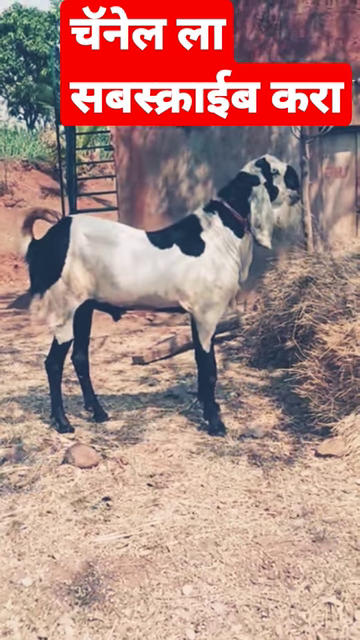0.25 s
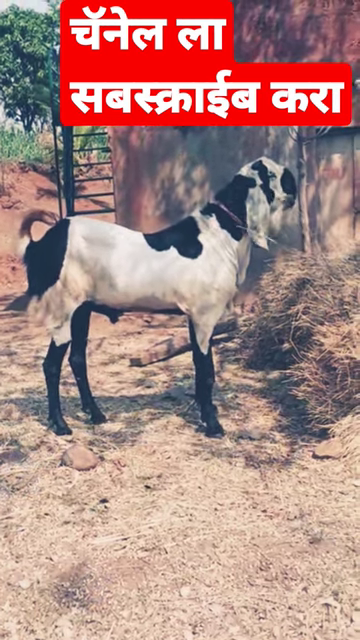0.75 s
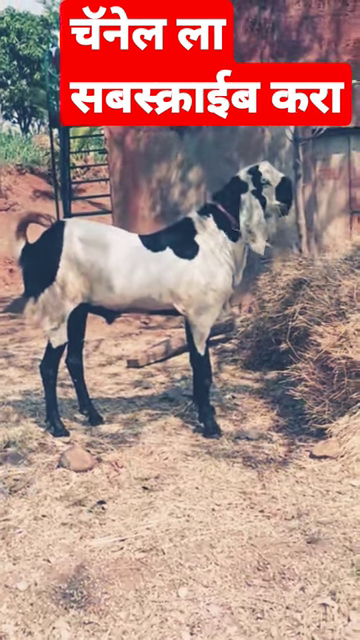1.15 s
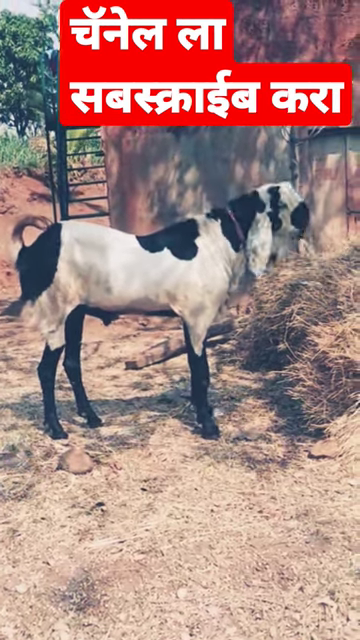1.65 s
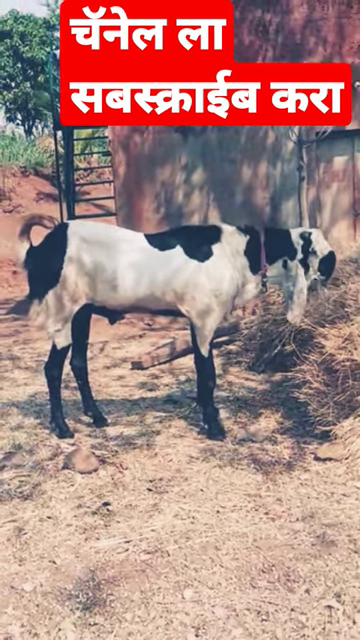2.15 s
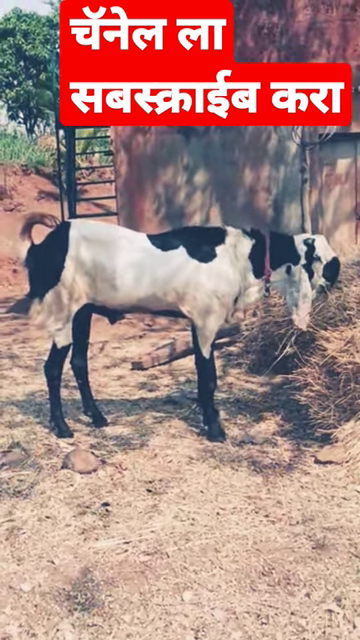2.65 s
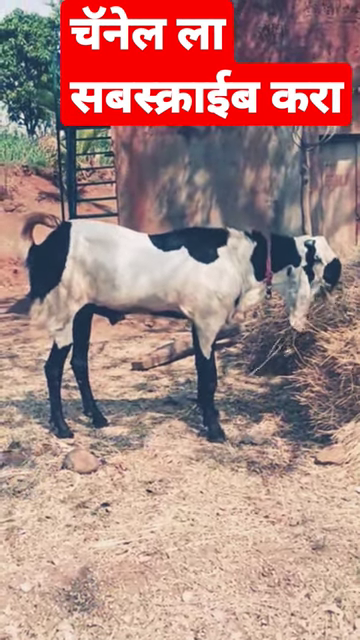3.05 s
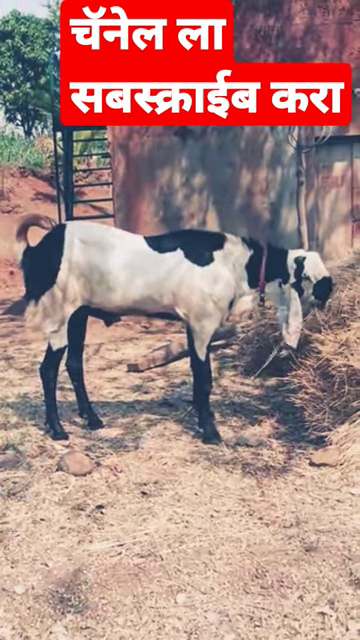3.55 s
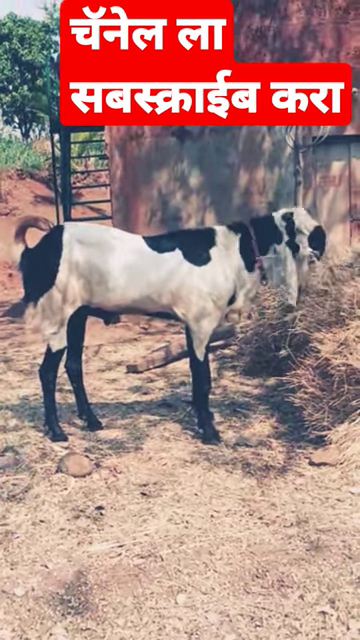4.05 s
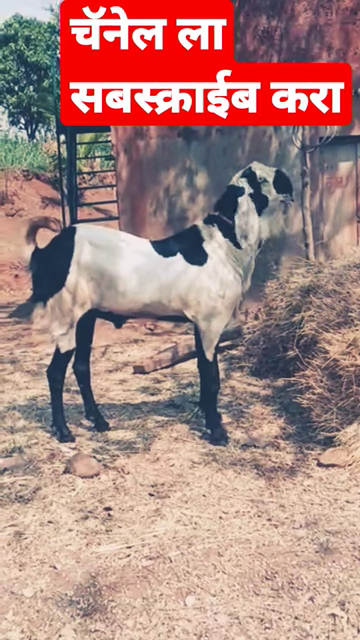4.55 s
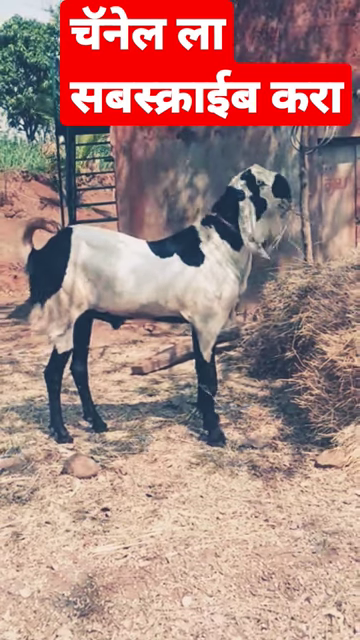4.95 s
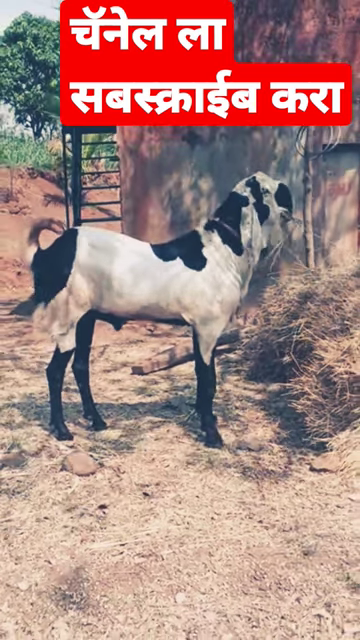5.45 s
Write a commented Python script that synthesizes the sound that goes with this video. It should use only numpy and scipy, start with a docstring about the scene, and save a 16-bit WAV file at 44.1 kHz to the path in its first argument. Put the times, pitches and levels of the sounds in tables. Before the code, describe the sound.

The tail of one goat bleat, then three rough bleats amid low wind thumps, faint bird chirps and a late slide of straw.

```python
"""An open farmyard: breath-excited throat resonances make a goat's four bleats, the first already ending.
Turbulent gusts, mostly at the left of two microphone ports, open the gap; during the second bleat soft
low pressure thumps, noise rustles and a knock join in. A faint far call and then thin gliding notes (two
bird chirps, faint goat wheezes, small squeaks) come before and around the third bleat and the last, hoarse
and nasal one. Near the end an armful of fodder slides. A wall slap and scatter surround the sources."""
import sys
import numpy as np
from scipy import signal
from scipy.fft import rfft, irfft, next_fast_len
from scipy.io import wavfile
from scipy.ndimage import uniform_filter1d, map_coordinates

SR = 44100
rng = np.random.default_rng(int(sys.argv[2]) if len(sys.argv) > 2 else 0)


def to_wav(s):
    """Save 16-bit WAV."""
    ch = np.atleast_2d(s).T  # columns
    pcm = np.round(np.clip(ch, -1, 1) * 32767)  # PCM
    wavfile.write(sys.argv[1], SR, pcm.astype(np.int16))


N = 251357
T = np.arange(N) / SR


def amp(db):
    """Level law: decibels to amplitude gain."""
    return 10 ** (np.asarray(db) / 20)


def unit(x):
    """Normalization: scales to rms 1."""
    return x / np.sqrt(np.mean(x ** 2) + 1e-20)


def running_rms(x, seconds):
    """Short-time energy: local rms under a triangular window."""
    size = max(int(seconds * SR), 2)
    power = uniform_filter1d(uniform_filter1d(x ** 2, size), size)
    return np.sqrt(abs(power) + 1e-20)


def read(points, hz):
    """Spectral interpolation along a log-frequency axis."""
    f, value = np.transpose(points)
    return np.interp(np.log(hz + 1), np.log(f + 1), value)


def shape(x, response):
    """Linear filtering: multiplies the spectrum by a response given as a function of Hz."""
    n = x.shape[-1]
    size = next_fast_len(n + 4096)
    spectrum = rfft(x, size) * response(np.fft.rfftfreq(size, 1 / SR))
    return irfft(spectrum, size)[..., :n]


def resonance(f, hz, width):
    """Damped resonance: second-order response with gain 1 at its centre."""
    return 1j * f * width / (hz ** 2 - f ** 2 + 1j * f * width)


def wander(n, hz):
    """Lowpassed chance: smooth noise of rms 1, about as fast as hz."""
    step = 16  # samples per coarse point
    coarse = shape(rng.standard_normal(n // step + 2), lambda f: np.exp(-(f / step / hz) ** 2))
    return unit(np.interp(np.arange(n) / step, np.arange(len(coarse)), coarse))


def bell(t, width):
    """Gaussian pulse: a smooth bump of height 1 around t = 0."""
    return np.exp(-(t / width) ** 2)


def surge(s, rise, fall):
    """Exponential growth to 1 at time s, then exponential decay."""
    return np.exp(-np.maximum((s - T) / rise, (T - s) / fall))


def ports(x, side, lag_ms=0.933):
    """Binaural cues: a source to the right reaches the left port later; side is left-right dB by Hz."""
    def response(f):
        delay = np.exp(-2j * np.pi * f * lag_ms / 10 ** 3)
        half_db = read(side, f) / 2
        return np.array([amp(half_db) * delay, amp(-half_db)])
    return shape(x, response)


def pan(x, side_db):
    """Intensity stereo: places a sound by its left-right level."""
    return x * amp([[side_db / 2], [-side_db / 2]])


def add(mix, s, sound):
    """Superposition: mixes a stereo sound in at time s."""
    part = mix[:, max(round(s * SR), 0):][:, :sound.shape[1]]
    part += sound[:, :part.shape[1]]


# spectrum of the open air: (frequency [Hz], relative level [dB])
AIR_SPECTRUM = [(20, -25.5), (75, -5.5), (330, -24), (850, -26), (1180, -23.5), (1800, -27.5), (6000, -34),
                (10000, -48.5)]
AIR_DB = -73


def air():
    """Diffuse field: quiet shaped noise, partly coherent between the ports."""
    noise = 0.2 * rng.standard_normal(N) + rng.standard_normal((2, N))
    swell_db = 1.5 * wander(N, 1)
    hush = unit(shape(noise, lambda f: amp(read(AIR_SPECTRUM, f))))
    return pan(hush, 4.1) * amp(AIR_DB + swell_db)


# reverberation of the yard: (frequency [Hz], time to fall 60 dB [s])
YARD_DECAY = [(1000, 0.35), (8000, 0.21)]


def yard(x):
    """Reverberation: sparse scatter from wall and ground, each band dying at its own speed."""
    taps = rng.standard_normal((2, SR // 2)) * (rng.random((2, SR // 2)) < 2000 / SR)
    taps[:, :round(.008 * SR)] = 0  # no scatter in the first 8 ms
    hz, t, z = signal.stft(taps, SR, nperseg=256)
    decay = amp(-60 * t / read(YARD_DECAY, hz)[:, None])
    tail = signal.istft(z * decay, SR, nperseg=256)[1]
    return signal.fftconvolve(x, tail / np.linalg.norm(tail[0]), axes=1)[:, :N]


# turbulence spectrum, before its frequency axis is scaled: (frequency [Hz], relative level [dB])
WIND_SPECTRUM = [(20, -37), (60, -7.5), (120, 9.5), (200, 5), (300, -13), (550, -35), (2000, -88.5)]
# stronger gusts: (time of peak [s], length [s], relative level on the left port [dB], left-right [dB])
GUSTS = [(0.567, 0.052, -45, 44), (1.363, 0.047, -37, 24), (1.607, 0.099, -30, 28),
         (1.786, 0.083, -37.5, 38), (1.93, 0.072, -41.5, -1), (2.067, 0.1, -44.5, 37),
         (2.231, 0.043, -35, 45), (2.338, 0.054, -31, 49), (2.625, 0.043, -40, 3.5),
         (2.788, 0.018, -33.5, 11), (2.881, 0.063, -33, 18), (3.148, 0.077, -51.5, 2),
         (3.328, 0.067, -49.5, 20), (3.536, 0.05, -46, 31), (3.68, 0.034, -38, 11), (3.912, 0.11, -36, 38),
         (4.157, 0.034, -43.5, 16), (4.386, 0.034, -31.5, 56), (4.446, 0.035, -32, 48),
         (4.691, 0.092, -45, 17), (5.22, 0.13, -42.5, 0.5), (5.451, 0.096, -46, -4),
         (5.632, 0.13, -53.5, 1)]
# the light, lumpy wind between the gusts
BREEZE_DB, BREEZE_SIDE_DB, LUMPY_DB, LUMPS_HZ = -75, 10.5, 7, 15


def wind():
    """Turbulence: independent noise at each port; stronger gusts shed smaller, brighter eddies."""
    lumps = np.array([wander(N, LUMPS_HZ), wander(N, LUMPS_HZ)])
    breeze = pan(amp(BREEZE_DB + LUMPY_DB * lumps), BREEZE_SIDE_DB)
    gust_power = sum(amp([[db], [db - side_db]]) ** 2 * bell(T - s, length / 2)
                     for s, length, db, side_db in GUSTS)
    force = np.sqrt(breeze ** 2 + gust_power)
    noise = rng.standard_normal((2, N))
    slow = unit(shape(noise, lambda f: amp(read(WIND_SPECTRUM, f * 1.524))))
    fast = unit(shape(noise, lambda f: amp(read(WIND_SPECTRUM, f * 0.94))))
    fast_share = force / (force + amp(-31.5))
    eddies = (1 - fast_share) * slow + fast_share * fast
    level = force * amp(4.87 * wander(N, 19) + 0.04)
    return level * eddies / running_rms(eddies, 0.061)


# sharp eddies on the left port, before the low cut: (time [s], relative level [dB], width [ms])
THUMPS = [(1.3686, -16.5, 1.29), (1.5589, -15, 0.86), (1.5844, -16, 0.75), (1.5953, -6.5, 0.61),
          (1.617, -18, 0.88), (1.7699, -18, 1.24), (1.7926, -20, 1.43), (1.8665, -11, 0.67),
          (2.048, -15, 1.87), (2.2194, -28, 1.3), (2.3096, -20.5, 0.81), (2.3248, -21.5, 1.03),
          (2.8642, -8, 0.91), (3.8370, -13.5, 0.87), (3.876, -22, 0.96), (3.901, -34, 1.04),
          (4.621, -15.5, 0.72), (5.1896, -17.5, 1.03)]
# low pressure around an eddy: share of its height, times its width
SUCTION_SHARE, SUCTION_SPREAD = 0.24, 1.9


def thumps():
    """Transient response: single pressure bumps swing back through the microphone's low cut."""
    bumps = np.zeros(N)
    for s, db, width in THUMPS:
        for height, spread in [(1, 1), (-SUCTION_SHARE, SUCTION_SPREAD)]:
            bumps += amp(db) * height * bell((T - s) * 10 ** 3, np.sqrt(2) * width * spread)
    swing = signal.sosfilt(signal.butter(3, 80, "highpass", fs=SR, output="sos"), bumps)
    return swing * amp([[1.0], [-42]])  # left, right [dB]


# spectrum of the straw fizz: (frequency [Hz], relative level [dB])
STRAW_SPECTRUM = [(300, -14.5), (1000, -26.5), (5000, 4), (8500, -0.5), (13500, -1), (15000, -0.5)]
# resonances of the sliding armful: (frequency [Hz], width [Hz], relative level [dB])
ARMFUL_MODES = [(763, 240, 4.5), (1277, 28, 8.5), (2390, 520, -3.5), (4880, 170, -6.5)]
# stirrings of the fodder: (time of peak [s], rise constant [s], fall constant [s], level [dB])
STIRS = [(1.419, 0.13, 0.24, -77), (3.75, 0.084, 0.12, -76.5), (4.35, 0.26, 1, -77.5),
         (4.66, 0.048, 0.081, -65), (5.18, 0.025, 0.13, -66)]
RUSTLE_DB = -86.5  # the fodder left alone
# a shifted armful slides, and goes on settling
SWISH_AT_S, SWISH_RISE_S, SWISH_DB, SWISH_FALL_S = 5.178, 0.012, -55, 0.046
SETTLE_DB, SETTLE_S = -63, 0.28


def fodder():
    """Shot noise: countless tiny straw cracks make a fizz; one armful slides and settles."""
    spread_db = 2 * np.minimum(rng.exponential(1, (2, N)), 5)
    struck = rng.random((2, N)) < 1500 / SR
    cracks = struck * rng.standard_normal((2, N)) * amp(spread_db)
    grain = unit(cracks) * 0.64 + rng.standard_normal((2, N))
    fizz = unit(shape(grain, lambda f: amp(read(STRAW_SPECTRUM, f))))
    fizz *= amp(1.8 * wander(N, 14))
    stirring = amp(RUSTLE_DB) + sum(amp(db) * surge(s, rise, fall) for s, rise, fall, db in STIRS)

    friction = 0.24 * rng.standard_normal(N) + rng.standard_normal((2, N))
    slide = unit(shape(friction, lambda f: sum(amp(db) * abs(resonance(f, hz, width)) ** 1.26
                                               for hz, width, db in ARMFUL_MODES)))
    sliding = amp(SWISH_DB) * surge(SWISH_AT_S, SWISH_RISE_S, SWISH_FALL_S)
    settling = amp(SETTLE_DB) * surge(SWISH_AT_S, SWISH_RISE_S, SETTLE_S)
    return fizz * stirring + pan(slide * (sliding + settling), 4.6)


# stalks that snap and knock:
# (time [s], relative level [dB], frequency [Hz], width [Hz], time to fall 60 dB [s], left-right [dB])
TICKS = [(1.465, -52, 510, 260, 0.1, 13), (2.208, -69, 6260, 12200, 0.18, 9.5),
         (2.257, -36.5, 2100, 200, 0.015, 4.5), (2.759, -37, 3500, 5460, 0.006, -19),
         (2.967, -53.5, 13200, 5000, 0.01, -13), (5.112, -45.5, 720, 414, 0.042, 9),
         (5.174, -62, 885, 1480, 0.052, 26)]


def ticks():
    """Impulsive excitation: each stalk gives a short dying noise burst in its own band."""
    out, t = np.zeros((2, N)), np.arange(SR // 5) / SR
    for s, db, hz, width, t60, side_db in TICKS:
        burst = unit(shape(rng.standard_normal(len(t)), lambda f: resonance(f, hz, width) ** 2))
        burst /= running_rms(burst, 0.0013)
        onset = 1 - np.exp(-t / 0.0022)
        add(out, s, pan(burst * amp(db - 60 * t / t60) * onset, side_db))
    return out


# two bird chirps, faint goat wheezes and small squeaks:
# (start [s], length [s], first pitch [Hz], top or middle pitch [Hz], last pitch [Hz], relative level [dB])
THIN_NOTES = [(2.923, 0.12, 3660, 4136, 3720, -62.5), (3.176, 0.14, 3580, 4200, 3410, -60),
              (3.339, 0.065, 2150, 2100, 2060, -73), (4.074, 0.082, 1883, 1925, 1860, -74.5),
              (4.999, 0.135, 2450, 2440, 2420, -76), (5.118, 0.042, 3330, 3180, 3040, -71.5)]


def thin_notes():
    """Frequency modulation: thin sines glide in pitch, half of them arched, the others sinking slightly."""
    out = np.zeros((2, N))
    for s, length, first_hz, mid_hz, last_hz, db in THIN_NOTES:
        u = np.linspace(-1, .62, int(length * SR))  # zero where the pitch passes mid_hz
        before = (mid_hz - first_hz) * abs(u) ** 1.3
        after = (mid_hz - last_hz) * (u / u[-1]) ** 2
        hz = (mid_hz - np.where(u < 0, before, after)) * (1 + 0.006 * wander(len(u), 150))
        tone = np.sin(2 * np.pi * np.cumsum(hz) / SR)
        note = unit(tone * signal.windows.tukey(len(u), .4))
        add(out, s, pan(amp(db) * note, 1.4))
    return out


FAR_START_S, FAR_LENGTH_S, FAR_DB = 2.3, 0.49, -66.5
FAR_END_HZ, FAR_TOP_HZ, FAR_HUSK_HZ = 1268, 1404, 3560


def far_call():
    """Tone plus noise: a faint, husky call from far off, one arch of pitch and level."""
    arch = np.sin(np.pi * np.clip((T - FAR_START_S) / FAR_LENGTH_S, 0, 1))
    hz = FAR_END_HZ + (FAR_TOP_HZ - FAR_END_HZ) * arch
    turns = np.cumsum(hz) / SR + .18 * wander(N, 90)
    husk = unit(shape(rng.standard_normal(N), lambda f: resonance(f, FAR_HUSK_HZ, 430) ** 2))
    voice = np.sin(2 * np.pi * turns) + amp(-24.0) * husk
    call = unit((1 + 0.44 * wander(N, 87)) * voice)
    return pan(call * amp(FAR_DB) * abs(arch) ** 0.69, 11.1)


LEAP_S, LEAP_DB = 0.0086, 3.5  # the voice starts soft, then leaps to full strength
QUAVER_HZ, QUAVER_S, QUAVER_DB = 10.7, 0.063, 2  # its level shakes briefly after the leap
SAG_S = 0.099  # tiredness grows ever faster as the air runs out
# the voice, and the upper resonances, climb by ONSET_DB in these times
ATTACK_S, OPENING_S, ONSET_DB = .05, 0.046, 24
# just before the stop the closing mouth tunes the low resonance to a harmonic
SWELL_LEAD_S, SWELL_S = 0.045, 0.057
# the middle resonances swell more broadly
BRIGHT_LEAD_S, BRIGHT_SWELL_S, BRIGHT_SWELL_SHARE = 0.051, 0.093, 1.01
# fade of the low, middle and upper resonances
RELEASE_DB_PER_S, BRIGHT_RELEASE_DB_PER_S, RASP_RELEASE_DB_PER_S = 228.5, 200, 267
TIRED_DB = 8  # the middle resonances dim by this much as the voice tires


def gesture(t, opens, leap, sagged, stop, db, bright_db, rasp_db, swell_db):
    """Articulation: softness, tiredness and mouth closure (0-1), and low, middle and upper levels in dB."""
    soft = .5 - .5 * np.tanh((t - leap) / LEAP_S)
    quaver = np.sin(2 * np.pi * QUAVER_HZ * (t - leap)) * bell(t - leap - QUAVER_S / 2, QUAVER_S)
    sag = np.exp(np.minimum(t - sagged, 0) / SAG_S)
    shut = np.clip(0.22 * soft + 0.85 * sag, 0, 1)
    effort = db - LEAP_DB * soft + QUAVER_DB * quaver
    voiced = effort - ONSET_DB * np.maximum(1 / 2 - t / ATTACK_S, 0)
    mouth = effort - ONSET_DB * np.clip(1 - (t - opens) / OPENING_S, 0, 1)

    over = np.maximum(t - stop, 0)
    swell = swell_db * bell(t - stop + SWELL_LEAD_S, SWELL_S)
    bright_swell = BRIGHT_SWELL_SHARE * swell_db * bell(t - stop + BRIGHT_LEAD_S, BRIGHT_SWELL_S)
    low = voiced + swell - RELEASE_DB_PER_S * over
    middle = mouth + bright_db + bright_swell - TIRED_DB * sag - BRIGHT_RELEASE_DB_PER_S * over
    upper = mouth + rasp_db - RASP_RELEASE_DB_PER_S * over
    return soft, sag, shut, (low, middle, upper)


def throat_ring(drive, modes, band, stretch):
    """Source-filter theory: the drive rings the resonances in one band; stretch moves them up and down."""
    # the throat's own time runs faster when it tightens
    steps, clock = np.arange(len(drive)), np.cumsum(stretch)
    even = map_coordinates(drive, [np.interp(np.arange(clock[-1]), clock, steps)])

    def response(f):
        peaks = sum(amp(db) * abs(resonance(f, hz, width)) ** 2
                    for hz, width, db in modes if band[0] < hz <= band[1])
        return peaks / (1 + (600 / (f + 1)) ** 8) / (1 + (f / 7200) ** 16)
    return unit(map_coordinates(shape(even, response), [clock]))


# low, middle and upper throat bands: (lower edge [Hz], upper edge [Hz])
THROAT_BANDS = [(0, 1400), (1400, 2600), (2600, 8000)]
# direction of the goat: (frequency [Hz], left-right [dB])
GOAT_SIDE = [(1200, 8.5), (1800, 6.5), (2350, -9.5), (3200, 7), (4400, 8.5), (8000, -18.5)]
# a hoarse throat flutters: its resonances dip as the middle ones swell
FLUTTER_HZ, FLUTTER_LAG_S, FLUTTER_DB, FLUTTER_SHIFT = 8.89, 0.065, 1.5, 0.017  # at full flutter
SOFT_JITTER, SOFT_BREATHY = .003, 0.12  # added while the voice is soft
CATCH_S, CATCH_BREATHY, CATCH_DB = .03, .25, 3  # until the mouth opens: husky and muffled
GROWL_CYCLES = .035  # timing throb per unit of growl
TREMBLE_DB, TREMBLE_HZ = 1.5, 22  # each throat band trembles a little in level
TAIL_S = 0.063


def bleat(row, pitch, hoarse, wide, narrow):
    """Source-filter voice: jittery pulses and air puffs ring a throat that goes narrow, wide, narrow."""
    breathy, growl, growl_hz, jitter, tired_jitter, flutter = hoarse
    start, opens, sagged, length = row[0], row[1], row[3], row[4]
    t = np.arange(max(start - ATTACK_S, 0), start + length + TAIL_S, 1 / SR)
    n = len(t)
    soft, sag, shut, (low, middle, upper) = gesture(t - start, *row[1:])
    shake = flutter * np.cos(2 * np.pi * FLUTTER_HZ * (t - start - sagged - FLUTTER_LAG_S))
    stretch = 1 - FLUTTER_SHIFT * shake
    catching = .5 - .5 * np.tanh((t - start - opens) / CATCH_S)
    breathy = breathy + SOFT_BREATHY * soft + CATCH_BREATHY * catching
    jitter = jitter + SOFT_JITTER * soft + tired_jitter * sag

    # strained folds throb in strength and timing, which puts side lines beside the harmonics
    throb = growl * np.cos(2 * np.pi * (growl_hz * t + 0.15 * wander(n, 16)))
    # each closure also comes a little early or late: low harmonics stay clean, high ones turn raspy
    turns = np.cumsum(np.interp(t, *np.transpose(pitch))) / SR
    turns = turns + GROWL_CYCLES * throb + jitter * (wander(n, 190) + wander(n, 35))
    folds = unit(sum(amp(4 * wander(n, 12)) * np.cos(2 * np.pi * k * turns) for k in range(1, 23)))
    uneven = 1 + throb / 2 + 0.15 * wander(n, 80)
    puffs = unit((.5 + np.cos(np.pi * turns) ** 2) * rng.standard_normal(n))
    drive = uneven * ((1 - breathy) * folds + breathy * puffs)

    out = np.zeros((2, n))
    levels = (low - CATCH_DB * catching, middle + FLUTTER_DB * shake, upper)
    for band, db in zip(THROAT_BANDS, levels):
        opened = throat_ring(drive, wide, band, stretch)
        closed = throat_ring(drive, narrow, band, stretch)
        pair = ports((1 - shut) * opened + shut * closed, GOAT_SIDE)
        out += pair / running_rms(pair.mean(0), 0.061) * amp(db + TREMBLE_DB * wander(n, TREMBLE_HZ))
    return t[0], out * signal.windows.tukey(n, .04)


# course of each bleat: (start [s]; then from the start: mouth opens [s], voice leaps [s],
# pitch has sagged [s], voice stops [s]; relative effort, brightness, rasp, closing swell [dB])
BLEATS = [(-.6, .1, 0.26, 0.74, 0.659, -50.5, -10.5, -9.5, 7.9),
          (1.019, 0.085, 0.2, 0.62, 0.66, -56.5, -2.5, -8, 11.2),
          (3.4, -0.024, 0.095, 0.518, 0.523, -55.5, 0.5, -8.5, 8.9),
          (4.2, -0.028, 0.028, 0.4836, 0.47, -55, 7, -14, 0.25)]
# pitch of each bleat, a list of points: (time [s], pitch [Hz])
PITCH = [
    [(0, 366.5), (.025, 347), (.085, 328.6), (.12, 311)],
    [(1.03, 351.3), (1.11, 336.2), (1.198, 348.5), (1.234, 407), (1.27, 360.2), (1.31, 398.9),
     (1.474, 390.1), (1.54, 363.3), (1.62, 356.5), (1.645, 321.9), (1.74, 307.8)],
    [(3.39, 319.7), (3.425, 344), (3.465, 339.3), (3.51, 390.4), (3.56, 362.6), (3.6, 388.2), (3.68, 375.5),
     (3.79, 366.6), (3.86, 351.8), (3.93, 321.5)],
    [(4.2, 305.2), (4.25, 331.2), (4.27, 376.9), (4.44, 398), (4.52, 379.6), (4.57, 384.4), (4.61, 369.4),
     (4.66, 360.4), (4.7, 340)],
]
# roughness of each bleat: (breathy share [0-1], growl depth [ratio], growl rate [Hz],
# jitter per wander [cycles], added jitter as the voice tires [cycles], flutter [0-1])
HOARSE = [(.02, .04, 83, .001, 0, 0), (.07, .36, 83, .003, 0, .2), (.11, .52, 82, .004, .006, .5),
          (.14, .8, 82, .012, 0, 1)]
# throat resonances at rest, by call and shape of mouth: (frequency [Hz], width [Hz], relative level [dB])
CLEAR_THROAT = [(1008, 81, 13), (1717, 230, 10), (3390, 290, 1), (4100, 870, -5), (5720, 720, 1.5)]
OPEN_THROAT = [(870, 250, -3.5), (1130, 170, -11.5), (1680, 65, -3), (1874, 290, 6.5), (2280, 520, -3.5),
               (3260, 500, 2.5), (3560, 420, 3.5), (5270, 700, -3), (6680, 1800, -11)]
STRAINED_THROAT = [(816, 85, -1), (1059, 174, -2.5), (1885, 125, 3), (2310, 560, 1.5), (3480, 600, 6),
                   (4070, 330, -4), (5700, 840, 1.5)]
CLOSING_THROAT = [(1008, 146, 13), (1787, 190, 12.5), (2380, 500, -14), (3540, 210, 3), (4200, 500, -11),
                  (5800, 390, -2.5)]  # mouth nearly shut
NASAL_THROAT = [(717, 256, 24), (1060, 38, 3), (1700, 150, -18), (2038, 36, -5.5), (2314, 260, -9.5),
                (2750, 200, 9.5), (3320, 350, -8), (3850, 360, -11), (4970, 560, -5)]
WALL_S, WALL_DB = .009, -8  # the slap off the shed wall behind the goat


def goat():
    """Voice and echo: a bleat's end, two open bleats, then a nasal one; the wall returns their treble."""
    out = np.zeros((2, N))
    throats = [(CLEAR_THROAT, CLEAR_THROAT), (OPEN_THROAT, CLOSING_THROAT),
               (STRAINED_THROAT, CLOSING_THROAT), (NASAL_THROAT, NASAL_THROAT)]
    for row, pitch, hoarse, throat in zip(BLEATS, PITCH, HOARSE, throats):
        add(out, *bleat(row, pitch, hoarse, *throat))
    slap = shape(out, lambda f: np.exp(-2j * np.pi * f * WALL_S) * f / (f + 1200))
    return amp(-2.5) * (out + amp(WALL_DB) * slap)


def scene():
    """Superposition: calls, thin notes and stalks sound in the yard; wind acts on the microphone itself."""
    calls = goat() + far_call()
    small = thin_notes() + ticks()
    scatter = yard(amp(-7.5) * calls + amp(-13.0) * small)
    return calls + small + scatter + fodder() + air() + wind() + thumps()


EDGE_HZ = 15600


def record(dry):
    """Band limiting: a linear-phase lowpass removes what lies above the edge."""
    lowpass = signal.firwin(511, EDGE_HZ, window=("kaiser", 9), fs=SR)
    return signal.oaconvolve(dry, lowpass[None], "same")


dry = scene()
out = record(dry)
to_wav(out)
```